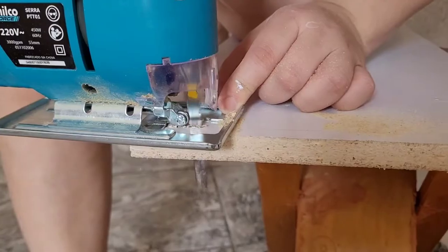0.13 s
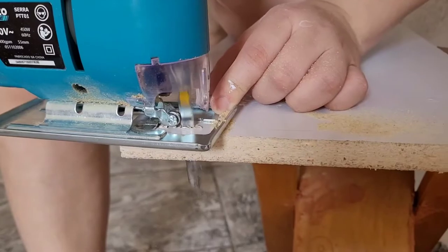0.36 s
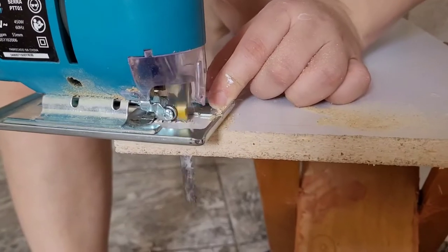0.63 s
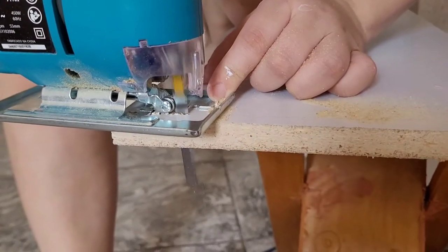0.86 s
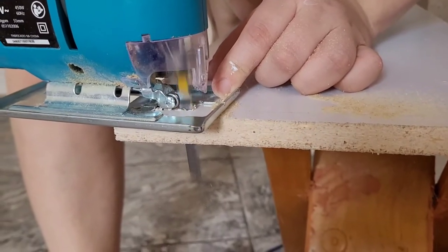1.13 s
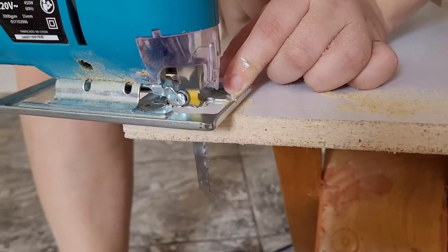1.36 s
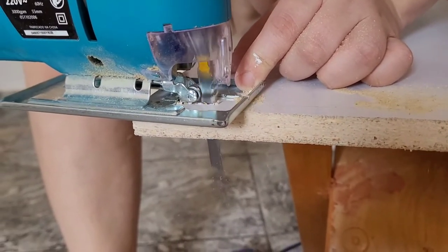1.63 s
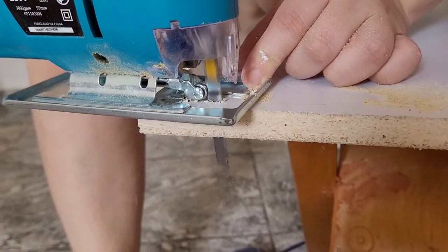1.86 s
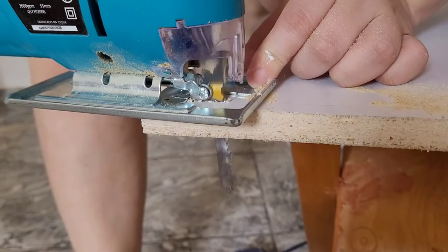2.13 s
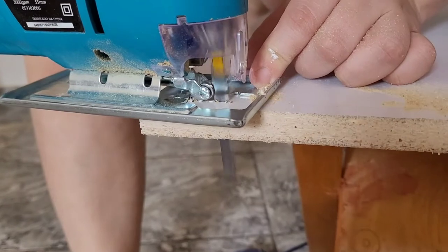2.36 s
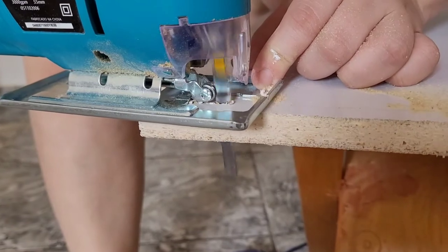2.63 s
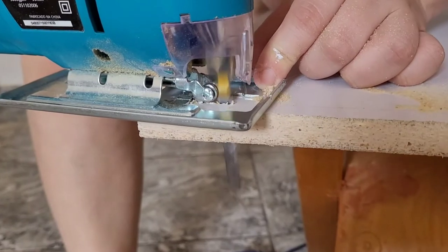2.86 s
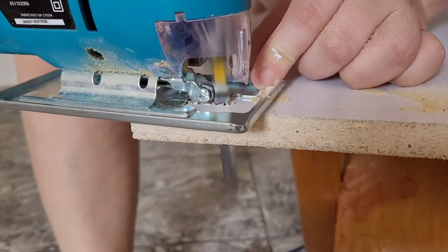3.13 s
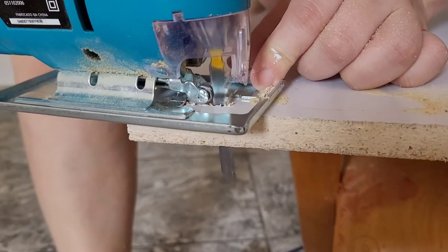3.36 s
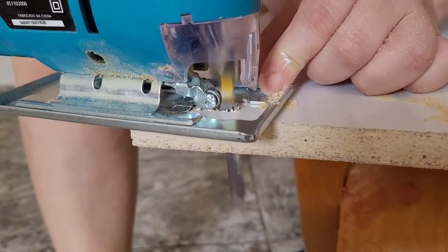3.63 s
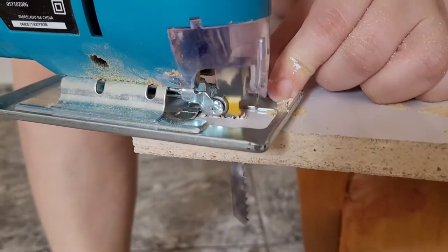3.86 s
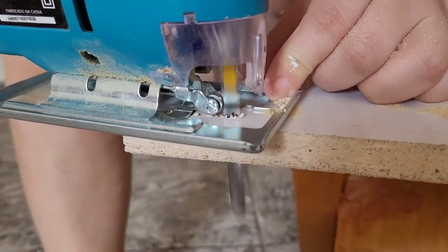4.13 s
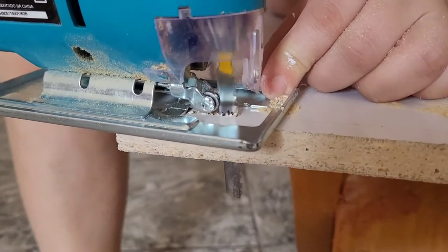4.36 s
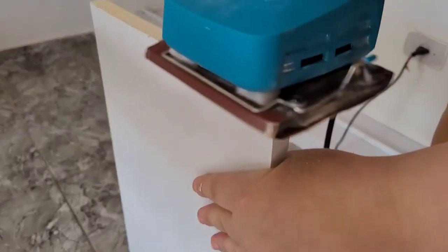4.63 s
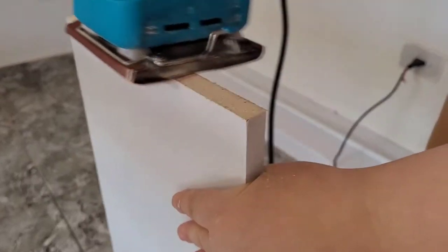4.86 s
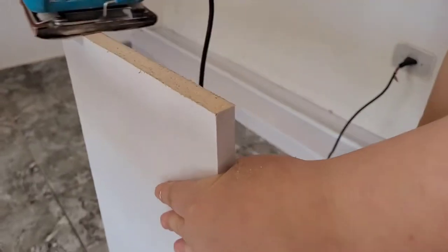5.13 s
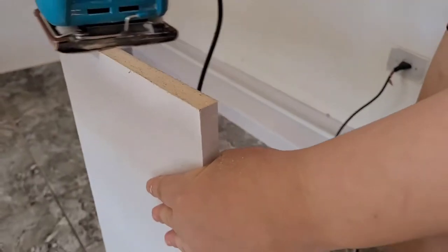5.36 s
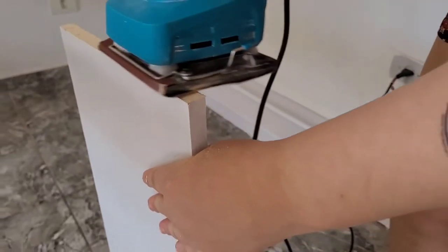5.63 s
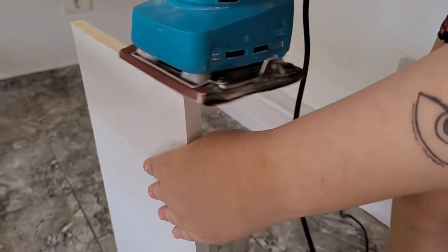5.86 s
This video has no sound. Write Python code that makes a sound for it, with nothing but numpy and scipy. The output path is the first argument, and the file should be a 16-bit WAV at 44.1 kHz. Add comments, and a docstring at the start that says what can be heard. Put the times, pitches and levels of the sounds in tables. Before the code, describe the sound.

After a tenth of a second of silence, a jigsaw enters abruptly at full speed, very close and dry, in stereo. It chatters at roughly twenty-five strokes per second: a low-mid rattling buzz, ringing blade and base plate, and a grainy rasp of chipboard tearing, brightest at the start. Small crisp ticks mark every stroke and grow slightly louder. The blade's ring strengthens around 1.9 s, and body vibration swells near 2.8 and 3.5 s. Soft low air puffs bump the microphone. At 4.4 s the saw cuts off instantly. After a tenth of a second of silence, at 4.5 s, an orbital sander appears already running: a smooth hum near 200 Hz, a high wavering whine near 5 kHz and broad scrubbing hiss. Its hum weakens around 5 s as it slides away, then returns stronger by 5.6 s, with brief board buzzes and a slightly sagging pitch until the end at 6 s.

```python
"""A jigsaw rattles, rings and rasps through chipboard close by in a small workshop, ticking on every stroke.
It stops, and after a tenth of a second of silence an orbital sander hums, whines and hisses on a board edge.
The saw is crank orders, struck metal modes and grainy noise, all locked to one count of blade strokes.
The sander is orders of one count of orbits plus scrubbed noise; low lumpy noise is air on the microphone ports."""
import sys
import numpy as np
from scipy import signal
from scipy.fft import rfft, irfft
from scipy.io import wavfile

SR = 44100
rng = np.random.default_rng(int(sys.argv[2]) if len(sys.argv) > 2 else 0)


def convert_level_to_amplitude(level_db):
    """Map a level in decibels to its linear amplitude factor."""
    exponent = np.asarray(level_db, float) / 20
    return 10 ** exponent


def generate_wav(signal):
    """Clip the signal to [-1, 1] and save it as 16-bit WAV at the path in sys.argv[1]."""
    frames = np.transpose(np.atleast_2d(signal))
    scaled = np.clip(frames, -1, 1) * 32767
    pcm = np.round(scaled).astype(np.int16)
    wavfile.write(sys.argv[1], SR, pcm)


N = 264600
TIME = np.arange(N) / SR
SAW_ON_S, SAW_OFF_S, SANDER_ON_S = .1005, 4.3905, 4.4905

# likeness of the saw's noise at the two ports: (frequency [Hz], left-right likeness [-1 to 1])
SAW_LIKENESS = [(60, .5), (290, 0.89), (900, 0.62), (1500, 0.29), (3000, 0.4), (6000, 0.053),
                (15000, 0.054)]
# lean of the saw's noise: (frequency [Hz], left minus right [dB])
SAW_BALANCE = [(60, 6), (200, 8), (700, -10.5), (1300, -6.5), (2400, -8), (3500, -6), (5000, 6.5),
               (7000, 13), (8400, 26.5), (9600, 25.5), (12000, 3.5), (15000, 7.5)]
# phase of the saw's noise: (frequency [Hz], lead of the left port [rad])
SAW_LEAD = [(20, -2.5), (950, 0.76), (1640, 4), (2150, 4), (2410, -0.63), (4650, 7.5), (16000, 32)]
# the board buzzes along on one order: (middle [s], length [s], multiple of the orbit rate, added level [dB])
BUZZES = [(4.65, 0.5, 12, -40), (4.715, 0.53, 4, -43.5), (4.924, 0.32, 2, -40), (4.956, 0.17, 12, -42),
          (4.981, 0.071, 3, -40), (4.972, .18, 4, -40.5), (5.15, 0.27, 3, -48), (5.342, 0.2, 3, -36),
          (5.345, 0.16, 12, -48), (5.36, 0.12, 2, -41.5), (5.67, 0.18, 4, -50), (5.925, 0.31, 12, -48),
          (5.94, 0.36, 3, -35), (5.97, 0.17, 4, -42), (4.68, 0.34, 7, -51), (5.2, 0.75, 6, -52),
          (4.99, .2, 10, -52), (5.7, 0.28, 7, -57), (5.696, 0.25, 10, -54), (4.695, .4, 72, -59),
          (5.33, .25, 72, -60), (5.97, .3, 72, -57)]


def rms_one(x):
    """Scale to unit rms."""
    return x / np.sqrt(np.mean(x ** 2) + 1e-20)


def in_time(rows):
    """Columns of a table as curves over time."""
    s, *columns = np.transpose(rows)
    return [np.interp(TIME, s, c) for c in columns]


def swells(rows, power=1.0):
    """Arches of given middle, length and height, added up; a low power flattens their tops."""
    total = 0
    for middle_s, length_s, top in rows:
        place = np.clip((TIME - middle_s) / length_s, -.5, .5)
        total = total + top * np.cos(np.pi * place).clip(0) ** power
    return total


def swelling(rest_db, rows, power=0.93):
    """Gain that rests at one level, with an arch added on top at each listed moment."""
    return convert_level_to_amplitude(rest_db) + swells([(s, length, convert_level_to_amplitude(db)) for s, length, db in rows], power)


def drift(rate, channels=1):
    """Slow chance of spread 1: coarse noise through two equal low-pass poles at rate Hz."""
    r = np.exp(-32 * np.pi * rate / SR)   # one coarse step is 16 samples
    white = rng.standard_normal((channels, N // 16 + 4002))
    slow = signal.lfilter([1], [1, -2 * r, r * r], white)[:, 4000:]   # drop the filter's start
    return np.array([np.interp(np.arange(N) / 16, np.arange(len(s)), rms_one(s)) for s in slow])


def tone(cycles, waver_db, waver_rad, apart_rad, rate, lead_rad=0):
    """A machine order of mid rms near 1 that wavers in level and phase, a little differently at each port."""
    level, slip, apart = drift(rate, channels=3)
    phase = 2 * np.pi * cycles + waver_rad * slip + (lead_rad + apart_rad * apart) * [[.5], [-.5]]
    level_db = waver_db * (level + .5 * apart * [[1], [-1]])
    return np.sqrt(2) / np.cos(lead_rad / 2) * convert_level_to_amplitude(level_db) * np.cos(phase)


def resonate(x, hz, width_hz):
    """Two-pole resonance, gain about 1 on top."""
    r = np.exp(-np.pi * width_hz / SR)
    poles = [1, -2 * r * np.cos(2 * np.pi * hz / SR), r * r]
    return signal.lfilter([(1 - r * r) / 2, 0, (r * r - 1) / 2], poles, x)


def at_ports(pair, spectrum, likeness, balance, lead=((20, 0), (20000, 0))):
    """Colour a mid and a side excitation and mix them into left and right; mid rms 1."""
    log_hz = np.log(np.maximum(np.fft.rfftfreq(N, 1 / SR), 1))

    def over_frequency(rows):
        hz, value = np.transpose(rows)
        return np.interp(log_hz, np.log(hz), value)

    db, lean_db, lead_rad = over_frequency(spectrum), over_frequency(balance), over_frequency(lead)
    alike = np.clip(over_frequency(likeness), -1, 1)
    mid, side = rfft(pair)
    both = np.sqrt(1 + alike) * mid + np.sqrt(1 - alike) * side * [[1], [-1]]
    gain = convert_level_to_amplitude(db + lean_db * [[.5], [-.5]])
    turn = np.exp(1j * lead_rad * [[.5], [-.5]])
    out = irfft(both * gain * turn, N)
    return out / np.std(out.mean(axis=0))


def bursts(strokes, table, spread_db, jitter):
    """Envelopes that jump at set places of each stroke and fade, new in strength and place every time."""
    out = 0
    for place, level_db, fade in table:
        luck = rng.standard_normal((int(strokes[-1]) + 2, 2))
        whole, part = np.divmod(strokes + 1 - place, 1)
        strength, slip = luck[whole.astype(int)].T
        late = part - np.abs(jitter * slip)
        out = out + convert_level_to_amplitude(level_db + spread_db * strength) * np.exp(-np.abs(late) / fade) * (late > 0)
    return out


def jigsaw():
    """All parts follow one count of strokes, the running sum of the blade speed."""
    # blade speed: (time [s], rate [strokes per s])
    stroke_rate = [(0.1, 25.05), (0.5, 24.8), (0.9, 24.65), (1.3, 24.65), (1.6, 24.71), (1.9, 24.6),
                   (2.1, 24.83), (2.3, 25.03), (2.6, 24.74), (3.0, 24.64), (3.3, 24.79), (3.6, 24.95),
                   (3.9, 24.94), (4.1, 25.12), (4.4, 24.76)]
    strokes = np.cumsum(in_time(stroke_rate)[0]) / SR
    return (crank_shake(strokes) + metal_ring(strokes) + tooth_rasp(strokes)
            + stroke_tick(strokes) + saw_motor_hum(strokes))


def crank_shake(strokes):
    """The crank knocks the body at both ends of the stroke: orders line up there, odd ones a quarter cycle off."""
    # crank orders before the sum is levelled: (multiple of the stroke rate, relative level [dB])
    crank_orders = [(3, -26), (4, -24), (6, -23.5), (7, -25), (8, -24), (9, -22), (10, -3), (13, -0.5),
                    (14, 3), (15, -2), (16, 2.5), (17, -15.5), (18, 0.5), (19, -6.5), (22, -15), (23, -10),
                    (25, -10), (26, -18.5), (28, -9.5), (29, -12.5), (30, -12.5)]
    # the board shakes along: (middle [s], length [s], added level [dB])
    board_swells = [(1.15, 0.28, -54), (1.7, 0.4, -50.5), (2.847, 0.85, -41.5), (3.503, 0.77, -45)]
    knock_place = .42   # part of a stroke
    shake = 0
    for k, db in crank_orders:
        cycles = k * (strokes - knock_place) + k % 2 / 4
        shake = shake + convert_level_to_amplitude(db) * tone(cycles, waver_db=1.5, waver_rad=.55, apart_rad=.35, rate=.8)
    lean = convert_level_to_amplitude(np.array([[-1.2], [1.2]]))   # dB, left and right
    return swelling(-37, board_swells) * lean * rms_one(shake)


def metal_ring(strokes):
    """The blade and the metal base plate ring at their own modes, struck by the cut."""
    # blade modes: (frequency [Hz], width [Hz], relative level [dB])
    blade_modes = [(900.4, 47, -2), (942.6, 37.5, 4), (985, 45, -1), (1445, 49, -2)]
    # base plate modes: (frequency [Hz], width [Hz], relative level [dB])
    plate_modes = [(2375, 35, 3.5), (2855, 37, 0.5)]
    # how hard the blade is fed into the board, as its ring: (time [s], level [dB])
    feed = [(.1, -39.5), (.5, -37), (.95, -39), (1.3, -35.5), (1.6, -35.5), (1.9, -31), (2.2, -33.5),
            (2.42, -37.5), (2.6, -34.5), (3.1, -35.5), (3.5, -37.5), (4.4, -35.5)]
    # ring of the base plate, nearly steady, weakest at 3.2 s, back by the end: (time [s], level [dB])
    plate_ring = [(.1, -38.5), (.7, -38.5), (1.9, -39), (2.5, -39.5), (3.2, -49), (4.4, -40)]
    blade = convert_level_to_amplitude(in_time(feed)[0]) * struck(strokes, blade_modes, chatter_db=-37)
    plate = convert_level_to_amplitude(in_time(plate_ring)[0]) * struck(strokes, plate_modes, chatter_db=-36)
    return blade + plate


def struck(strokes, modes, chatter_db):
    """The same few blows every stroke, nearly on time, ring each mode at a strength of its own, over chatter."""
    # blows of the blade on the work: (place in the stroke [0-1], relative level [dB])
    bites = [(.87, 1), (.02, -7), (.2, -11), (.5, -8)]
    place, bite_db = np.transpose(bites)
    count = int(strokes[-1]) - 1
    late = .003 * rng.standard_normal((count, len(bites)))   # strokes
    at = np.searchsorted(strokes, np.arange(count)[:, None] + place + late)
    chatter = convert_level_to_amplitude(chatter_db) * rng.standard_normal((2, N))
    out = 0
    for hz, width_hz, db in modes:
        blows = chatter.copy()
        blows[:, at] += convert_level_to_amplitude(bite_db + 1.5 * rng.standard_normal((count, len(bites))))
        grip_db = db + 1.1 * drift(1.5)   # the grip on blade and plate shifts slowly
        out = out + resonate(resonate(convert_level_to_amplitude(grip_db) * blows, hz, width_hz), hz, 2 * width_hz)
    nearly_flat = [(20, 0.0042), (20000, 0.0038)]   # (frequency [Hz], level [dB])
    return at_ports(out, nearly_flat, SAW_LIKENESS, SAW_BALANCE, SAW_LEAD)


def tooth_rasp(strokes):
    """Chips tear off in grains of noise, hardest just after the blade turns round; it grows as the cut deepens."""
    # colour of the rasp: (frequency [Hz], relative level per Hz [dB])
    rasp_colour = [(60, -32), (180, -39), (230, -9), (340, -12), (460, -4), (530, -10.5), (800, -10.5),
                   (1110, -3.5), (2900, -3), (4000, -6.5), (5000, -10), (6100, -19), (7900, -25.5),
                   (8900, -36.5), (11400, -22.5), (13000, -26), (14200, -25), (16000, -29)]
    # bursts after the turns: (place in the stroke [0-1], level over the steady grains [dB], fade [strokes])
    turns = [(.22, -7, .22), (.73, -5, .18)]
    grains = rng.standard_normal((2, N)) * convert_level_to_amplitude(0.74 * drift(384) + 0.45 * drift(8.1))
    grains = grains * (1 + bursts(strokes, turns, spread_db=3.0, jitter=.015))
    rasp = at_ports(grains, rasp_colour, SAW_LIKENESS, SAW_BALANCE, SAW_LEAD)
    # brighter while the teeth are near the edge: falls 15 dB per s
    rasp = rasp + convert_level_to_amplitude(-15 * TIME) * resonate(rasp, 5100, 1300)
    level_db, growth_db_per_s = -31, 0.21
    return convert_level_to_amplitude(level_db + growth_db_per_s * TIME) * rasp


def stroke_tick(strokes):
    """Short bright noise bursts at two places of every stroke, louder as the cut deepens."""
    # colour of the tick: (frequency [Hz], relative level per Hz [dB])
    tick_colour = [(4000, -32.5), (6500, -2.5), (8100, -2.5), (9000, -10.5), (11000, -0.5), (13000, -6.5),
                   (16000, -6)]
    # ticks: (place in the stroke [0-1], relative level [dB], fade [strokes])
    tick_places = [(.585, -12.5, .05), (.75, -21, .08)]
    # the ticks slide within the stroke: (time [s], lateness [strokes])
    tick_lag = [(.1, 0), (.7, .04), (1.6, .035), (2.6, .01), (4.4, -.03)]
    taps = bursts(strokes - in_time(tick_lag)[0], tick_places, spread_db=1.2, jitter=.01)
    tick = at_ports(rng.standard_normal((2, N)) * taps, tick_colour, SAW_LIKENESS, SAW_BALANCE, SAW_LEAD)
    level_db, growth_db_per_s = -52.5, 1.22
    return convert_level_to_amplitude(level_db + growth_db_per_s * TIME) * tick


def saw_motor_hum(strokes):
    """The motor turns at a fixed ratio to the blade and hums as one wavering tone."""
    # the hum comes up: (middle [s], length [s], added level [dB])
    hum_swells = [(.2, 0.66, -47.5), (2.29, 0.54, -43), (3.8, 1.6, -49)]
    motor_order = 24.45   # multiple of the stroke rate
    hum = tone(motor_order * strokes, waver_db=1.2, waver_rad=1.0, apart_rad=.5, rate=4.0)
    return swelling(-51, hum_swells, power=.5) * hum


def sander():
    """All tones follow one count of orbits; the hiss follows how the sander slides along the edge."""
    # sander speed: (time [s], rate [orbits per s])
    orbit_rate = [(4.49, 207.8), (4.8, 204.65), (5, 203.9), (5.17, 204.6), (5.3, 204.15), (5.42, 203.25),
                  (5.6, 202.7), (5.85, 201.75), (6, 201.6)]
    # the sander slides to the far end of the edge and back, as order 1: (time [s], level [dB])
    sweep = [(4.5, -33.5), (4.65, -34), (4.95, -39.5), (5.22, -38.5), (5.4, -35.5), (5.6, -31.5),
             (6, -31.5)]
    orbits = np.cumsum(in_time(orbit_rate)[0]) / SR
    sweep_db, = in_time(sweep)
    return (orbit_weight(orbits, sweep_db) + board_buzz(orbits) + fan_whine(orbits)
            + faint_tones(orbits) + current_side_tones(orbits) + sanding_hiss(orbits, sweep_db))


def orbit_weight(orbits, sweep_db):
    """The off-centre weight hums once per orbit."""
    return convert_level_to_amplitude(sweep_db) * tone(orbits, waver_db=.5, waver_rad=.4, apart_rad=.45, rate=2.5, lead_rad=0.13)


def board_buzz(orbits):
    """Higher orders of the weight and commutator, each swelling when the board buzzes along."""
    # buzzing orders: (multiple of the orbit rate, level at rest [dB], lead of the left port [rad])
    buzz_orders = [(2, -49.5, 0.17), (2.996, -45, 1.14), (3.993, -48, 0.96), (11.98, -50.5, 0.62),
                   (5.98, -58, .5), (7, -53, .5), (9.84, -56, .5), (72, -67, .5)]
    buzz = 0
    for k, rest_db, lead in buzz_orders:
        own = [(s, length, db) for s, length, order, db in BUZZES if round(order) == round(k)]
        order_tone = tone(k * orbits, waver_db=1.2, waver_rad=.4, apart_rad=.45, rate=6.0, lead_rad=lead)
        buzz = buzz + swelling(rest_db, own) * order_tone
    return buzz


def fan_whine(orbits):
    """The fan whines on order 24, moves between the ports and dips briefly."""
    # the whine dips: (middle [s], length [s], depth [dB])
    whine_dips = [(4.6, 0.28, 3.5), (4.9, 0.067, 5), (4.965, 0.024, 11), (5.07, 0.063, 7),
                  (5.21, 0.091, 10), (5.36, 0.065, 1.5), (5.93, 0.19, 7)]
    # lean of the whine: (time [s], left minus right [dB])
    whine_pan = [(4.6, -11), (5.1, 1.5), (5.56, 2.5), (5.75, -6.5)]
    level_db = -34 - swells(whine_dips, power=1.4) + in_time(whine_pan)[0] * [[.5], [-.5]]
    whine = tone(24 * orbits, waver_db=1.0, waver_rad=0.19, apart_rad=0.2, rate=32.0, lead_rad=1.36)
    return convert_level_to_amplitude(level_db) * whine


def faint_tones(orbits):
    """Weak further orders that waver widely in level and phase."""
    # faint orders: (multiple of the orbit rate, level [dB])
    faint_orders = [(5, -51.5), (22, -56), (23, -51.5), (25, -54), (48, -62)]
    return sum(convert_level_to_amplitude(db) * tone(k * orbits, waver_db=3.5, waver_rad=2.1, apart_rad=1.6, rate=5.3)
               for k, db in faint_orders)


def current_side_tones(orbits):
    """The current pulses at twice the mains rate and puts side tones around commutator order 12."""
    beat = np.cos(2 * np.pi * 118 * TIME)   # Hz
    under_db = 17   # below the swells of order 12
    own = [(s, length, db - under_db) for s, length, order, db in BUZZES if round(order) == 12]
    carrier = tone(12 * orbits, waver_db=3.0, waver_rad=0.42, apart_rad=1.2, rate=11.0)
    return swelling(-46, own) * beat * carrier


def sanding_hiss(orbits, sweep_db):
    """Pad on the edge and fan air: noise scrubbed once an orbit, partly following the slide."""
    # colour of the hiss: (frequency [Hz], relative level per Hz [dB])
    hiss_colour = [(60, -39), (150, -34), (300, -26.5), (500, -22.5), (900, -15), (1500, -16), (2500, -15),
                   (3500, -18), (5000, -18.5), (6500, -24.5), (9000, -26), (16000, -27)]
    # likeness at the two ports: (frequency [Hz], left-right likeness [-1 to 1])
    hiss_likeness = [(60, -0.2), (240, 0.54), (950, -0.26), (3770, -0.065), (15000, -0.026)]
    # lean of the hiss: (frequency [Hz], left minus right [dB])
    hiss_balance = [(60, -10), (180, 24), (550, -12.5), (1650, 0), (4970, -3.5), (15000, 1)]
    scrub = 1 + .15 * np.cos(2 * np.pi * orbits)
    scrub = scrub * convert_level_to_amplitude(.5 * drift(200) + .8 * drift(10) + .4 * drift(2.5))
    hiss = at_ports(rng.standard_normal((2, N)) * scrub, hiss_colour, hiss_likeness, hiss_balance)
    hiss = hiss + swells([(5.56, 0.12, 0.3)]) * np.diff(hiss, prepend=0)   # the hiss brightens briefly
    level_db, follows, change_db_per_s = -33.5, 0.31, -2.5
    level_db = level_db + follows * (sweep_db - sweep_db.max()) + change_db_per_s * (TIME - SANDER_ON_S)
    return convert_level_to_amplitude(level_db) * hiss


def buffet():
    """Air on the ports: lumpy low noise, mostly its own at each port, pushed up by each puff."""
    # puffs of air: (middle [s], added level before the lean [dB])
    puffs = [(.92, -52), (1.68, -57), (1.95, -60), (2.15, -59), (2.52, -55), (2.68, -58), (3.02, -63),
             (3.47, -59), (3.7, -57), (3.95, -62), (4.28, -60), (4.5, -56.5), (4.7, -48), (5.89, -56),
             (5.97, -47)]
    puff_s = 0.085
    lumps = rng.standard_normal((2, N)) * convert_level_to_amplitude(3.0 * drift(11, channels=2))
    low_band = signal.butter(2, [35, 95], "band", fs=SR, output="sos")
    low = signal.sosfilt(low_band, lumps + 0.1 * lumps[0])
    steady_db = np.where(TIME < SANDER_ON_S, -75 + 2.5 * TIME, -80)   # saw draught, then sander draught
    gain = swelling(steady_db, [(s, puff_s, db) for s, db in puffs], power=1.5)
    lean = convert_level_to_amplitude(np.array([[3.5], [-3.5]]))   # dB, left and right
    return gain * lean * rms_one(low)


def scene():
    """Saw, silence, sander, each edge a few milliseconds long at most."""
    saw_edges_s = [SAW_ON_S - .002, SAW_ON_S + .001, SAW_OFF_S, SAW_OFF_S + .001]
    sawing = np.interp(TIME, saw_edges_s, [0, 1, 1, 0])
    sanding = np.interp(TIME, [SANDER_ON_S - .001, SANDER_ON_S + .002], [0, 1])
    return sawing * jigsaw() + sanding * sander() + (sawing + sanding) * buffet()


def top_cut(x):
    """Nothing passes above 16.5 kHz."""
    return signal.sosfilt(signal.butter(12, 16510, fs=SR, output="sos"), x)


def record(dry):
    """A steep low-pass cuts the top above 15.9 kHz."""
    low_pass = signal.ellip(10, .5, 70, 15900, fs=SR, output="sos")
    mix = signal.sosfilt(low_pass, dry)
    return top_cut(mix)


dry = scene()
out = record(dry)
generate_wav(out)
```